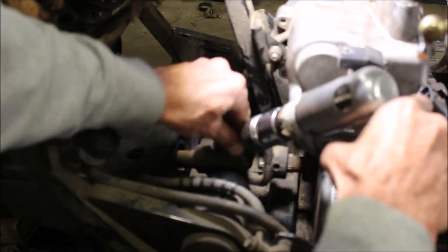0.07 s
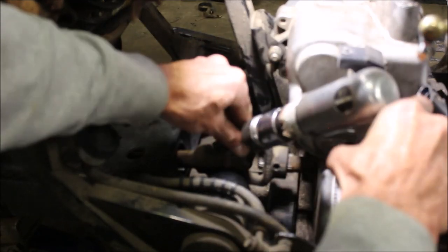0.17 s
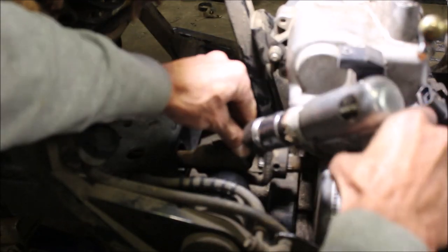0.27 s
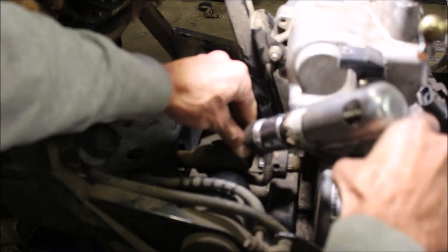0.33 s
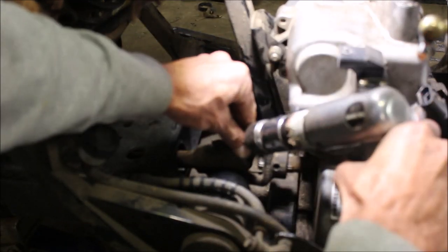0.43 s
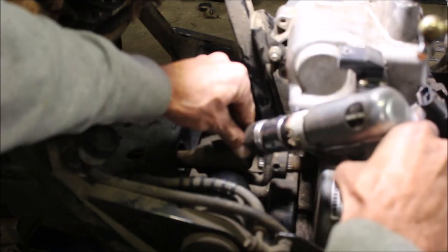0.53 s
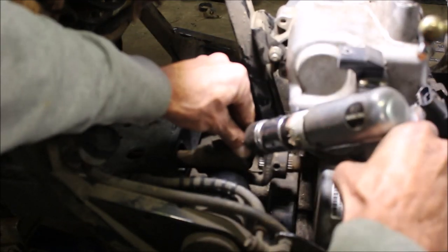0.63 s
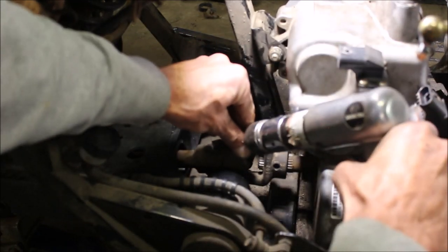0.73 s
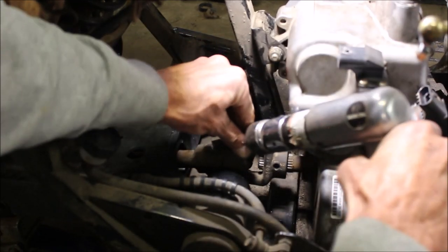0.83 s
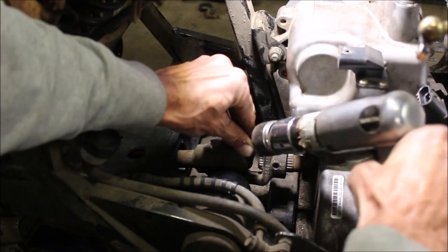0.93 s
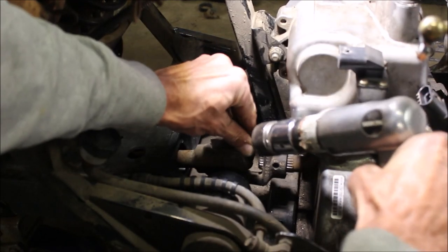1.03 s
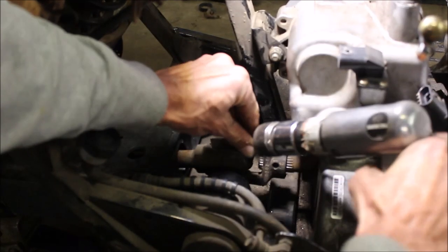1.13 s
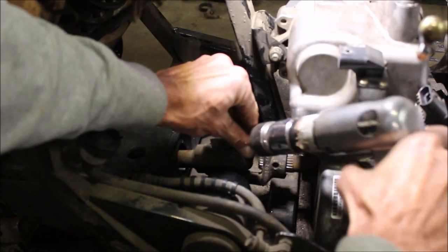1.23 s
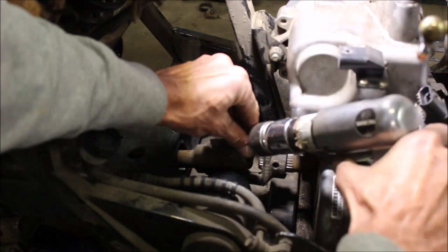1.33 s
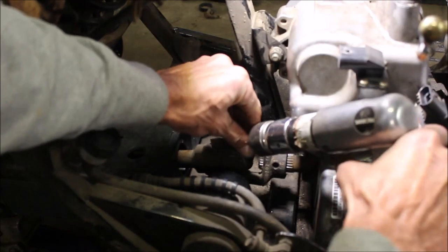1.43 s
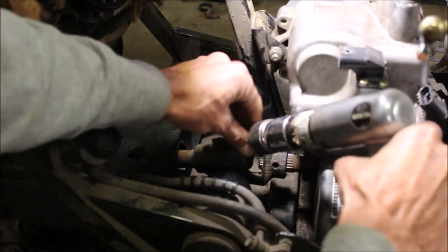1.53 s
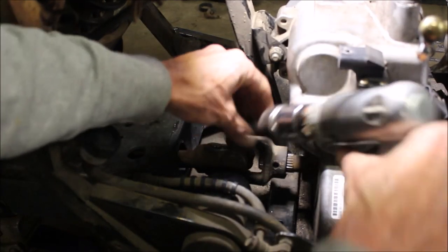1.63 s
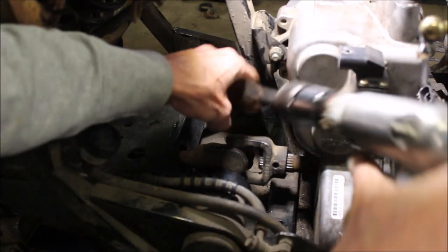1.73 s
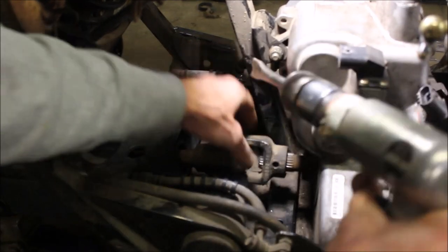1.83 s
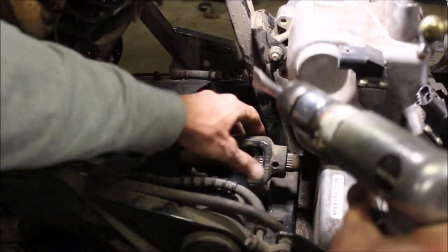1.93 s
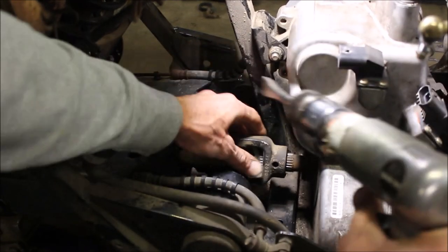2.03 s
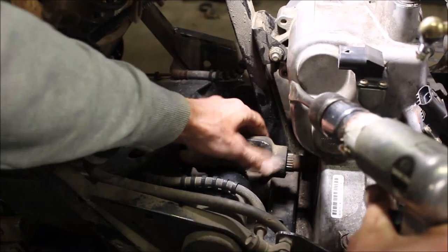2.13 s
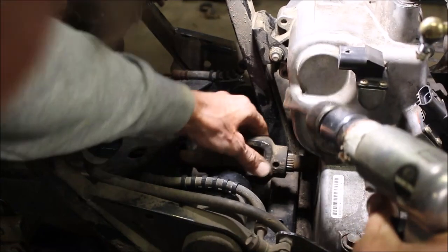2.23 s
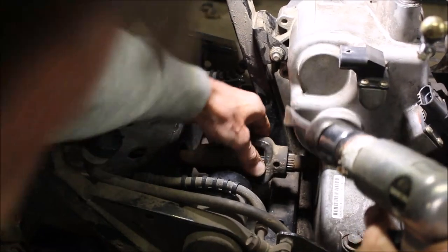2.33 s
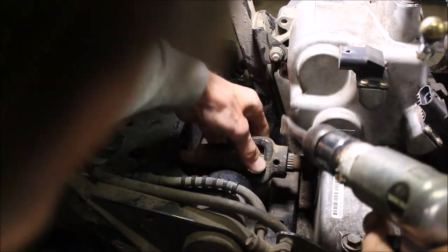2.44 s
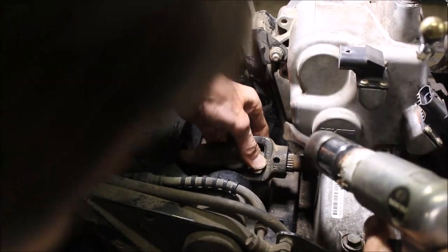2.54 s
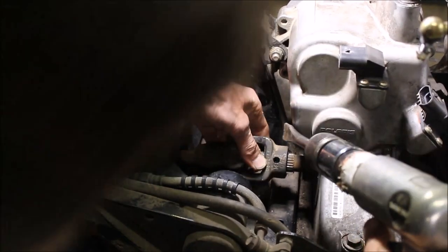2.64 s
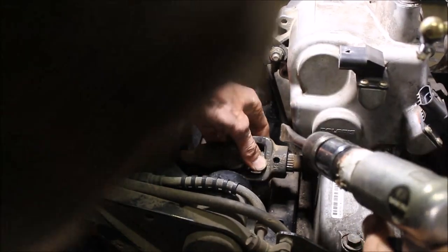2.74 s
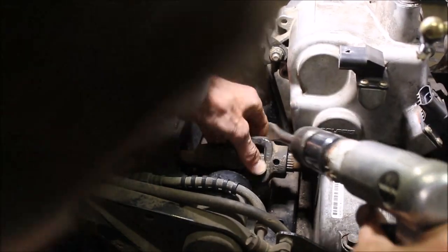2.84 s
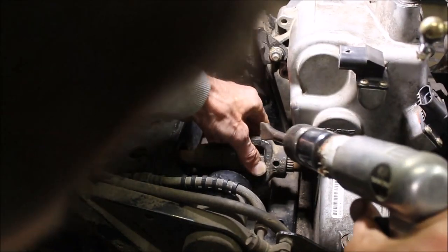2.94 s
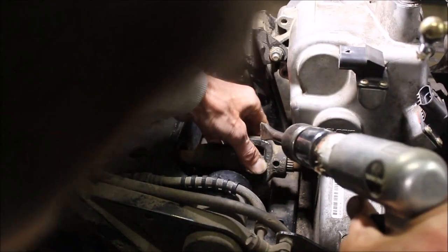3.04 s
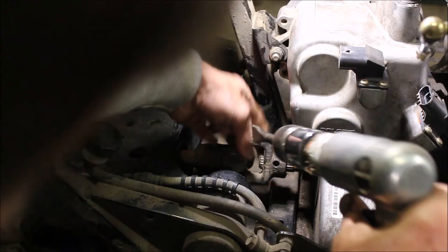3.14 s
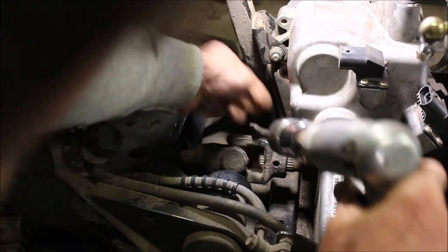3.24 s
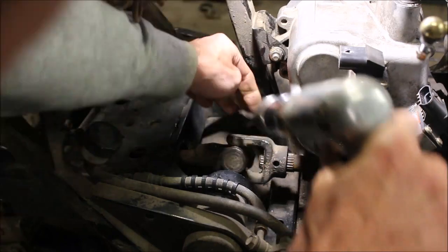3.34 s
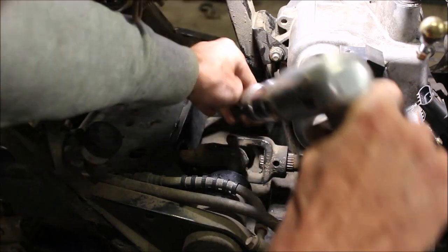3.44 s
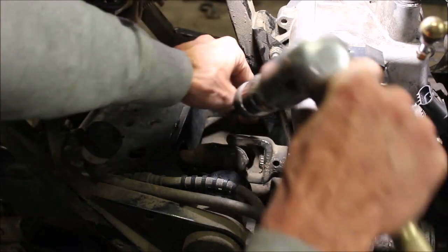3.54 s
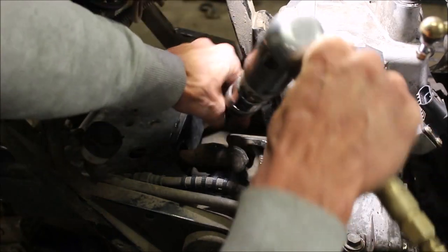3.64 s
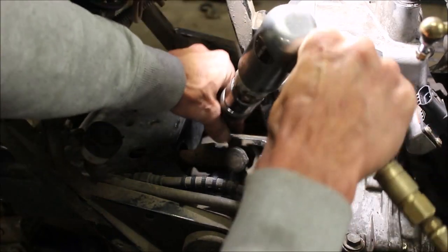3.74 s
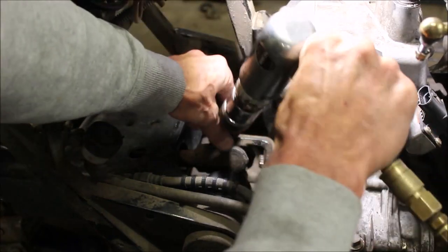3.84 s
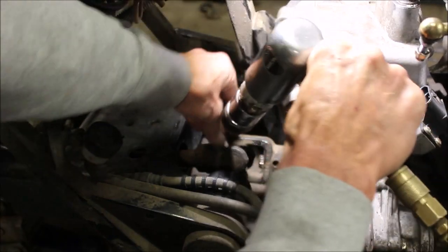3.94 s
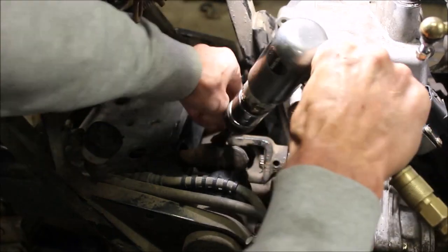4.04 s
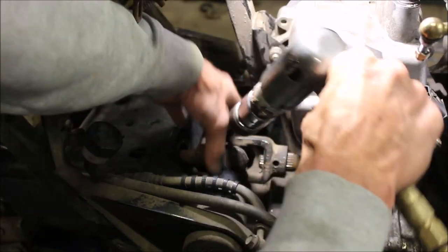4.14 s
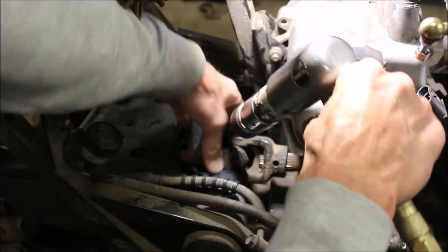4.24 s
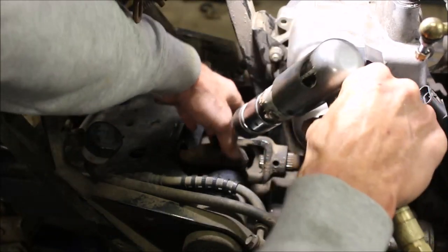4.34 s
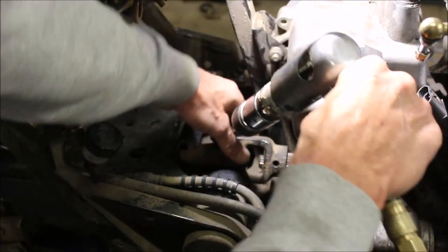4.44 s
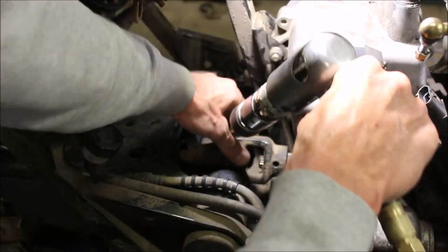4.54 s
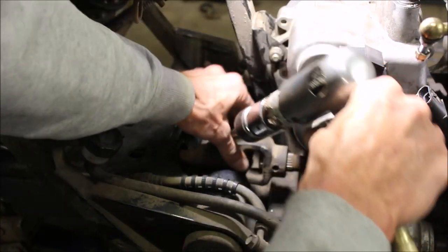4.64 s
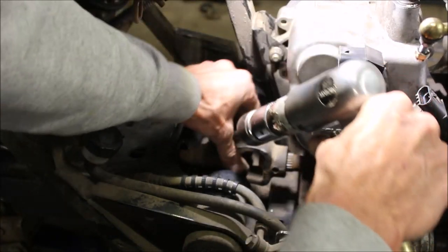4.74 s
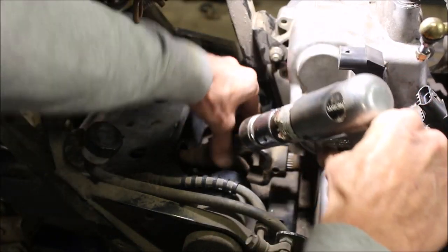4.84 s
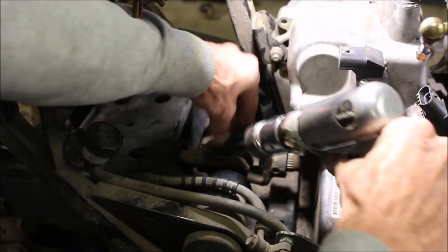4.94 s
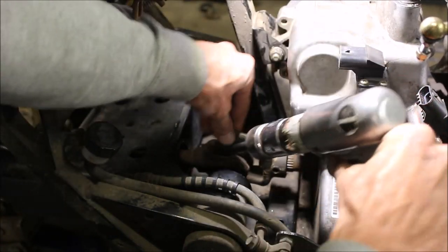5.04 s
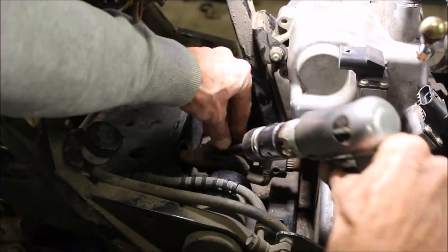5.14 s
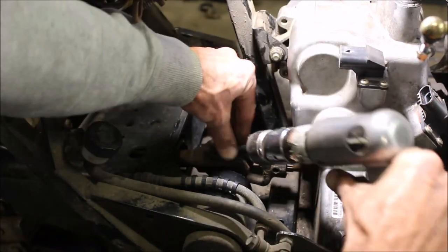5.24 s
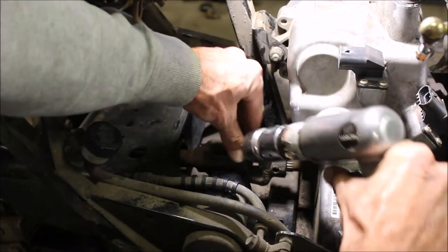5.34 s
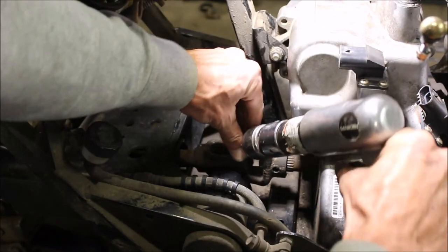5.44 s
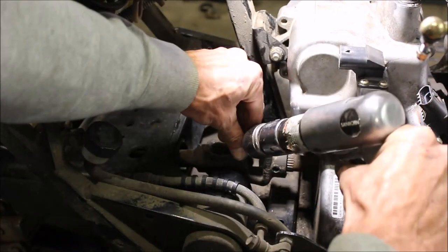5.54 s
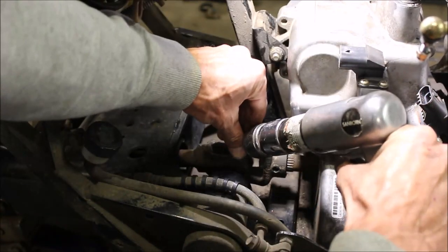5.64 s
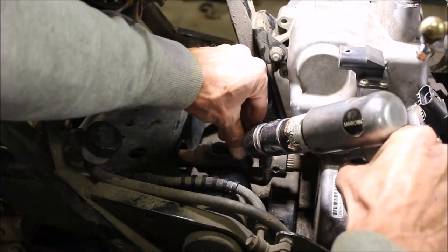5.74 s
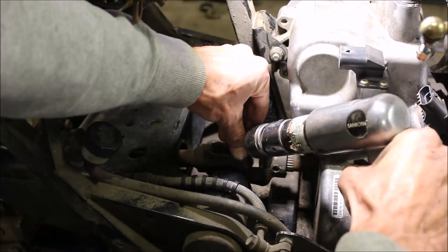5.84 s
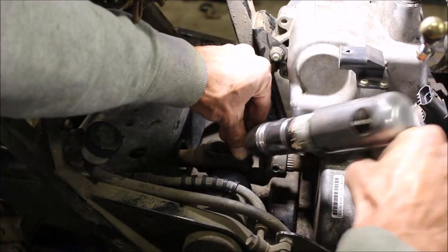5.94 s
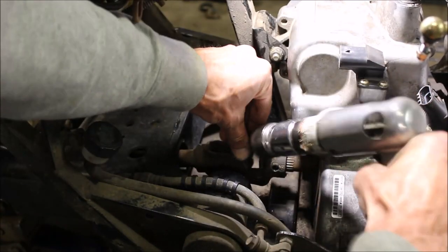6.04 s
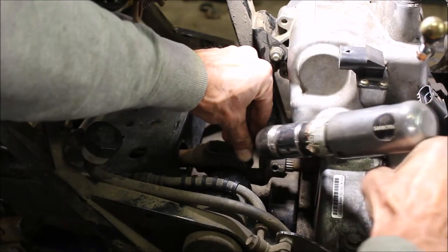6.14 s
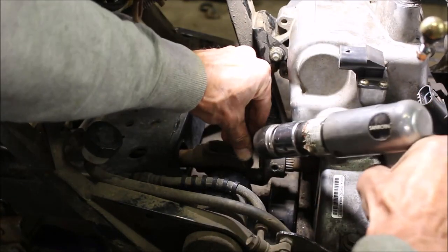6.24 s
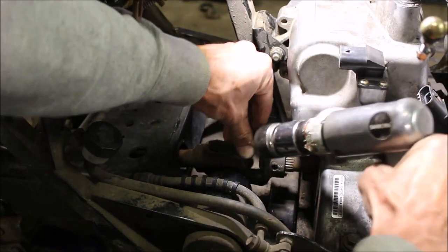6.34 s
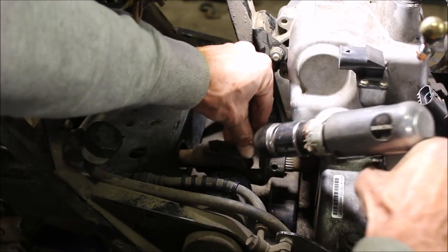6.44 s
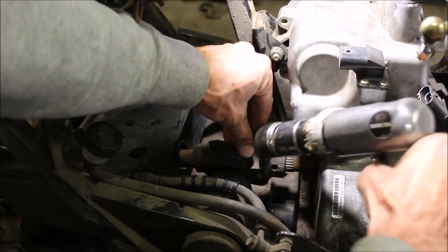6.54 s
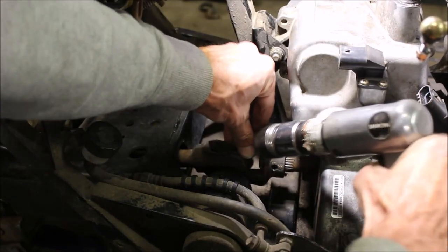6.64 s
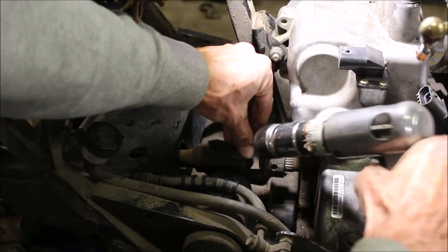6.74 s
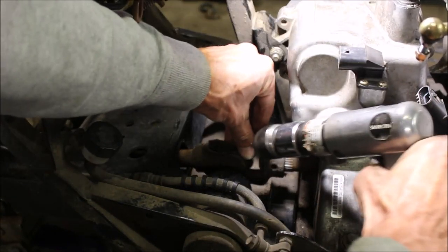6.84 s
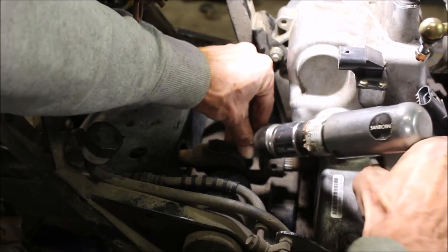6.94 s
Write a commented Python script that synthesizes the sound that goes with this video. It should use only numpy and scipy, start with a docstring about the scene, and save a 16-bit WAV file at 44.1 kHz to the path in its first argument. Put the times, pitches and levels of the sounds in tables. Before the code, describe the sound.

An air hammer rattles in two hard bursts against a steel shaft in a workshop, with thuds, scrapes and metal knocks between.

```python
"""First a workshop hums while a tool bumps, brushes and scrapes on parts; then an air hammer fires two bursts.
The hammer, heard close by in an engine bay, strikes a steel shaft: each stroke pops exhaust air and clanks.
Pops are shaped pressure pulses; clanks are noise and sharp edges ringing through resonances.
Hiss, rumble and rubbing are coloured noise, knocks are sums of fading tones, and the space answers with echoes."""
import sys
import numpy as np
from scipy import signal
from scipy.fft import rfft, irfft, next_fast_len
from scipy.io import wavfile
from scipy.ndimage import uniform_filter1d, map_coordinates

SR = 44100
rng = np.random.default_rng(int(sys.argv[2]) if len(sys.argv) > 2 else 0)


def wav_record(signal):
    """Record a signal, one row per channel, as 16-bit PCM in the file named by sys.argv[1]."""
    frames = np.transpose(np.atleast_2d(signal))
    bounded = np.clip(frames, -1, 1)
    # unit amplitude maps onto the largest positive 16-bit level
    quanta = np.round(bounded * 32767).astype(np.int16)
    wavfile.write(sys.argv[1], SR, quanta)


N = 308259


def amp(db):
    """dB to gain."""
    return 10 ** (np.asarray(db) / 20)


def unit(x):
    """Scaled to rms 1."""
    return x / np.sqrt(np.mean(x ** 2) + 1e-20)


def along(points, hz):
    """Reads a curve of (f/Hz, value) points on a log frequency axis."""
    f, v = np.transpose(points)
    return np.interp(np.log(hz + 1), np.log(f + 1), v)


def gains(curves):
    """Gain over time of (t/s, level/dB) curves added up, each fading to silence just outside its points."""
    t = np.arange(0, N + 32, 32) / SR
    total = np.zeros(len(t))
    for times, levels in map(np.transpose, curves):
        edged = [times[0] - .02, *times, times[-1] + .02]
        total += amp(np.interp(t, edged, np.pad(levels, 1, constant_values=-120)))
    return np.interp(np.arange(N) / SR, t, total)


def wobble(rate):
    """A smooth random curve, rate knots a second."""
    t = np.arange(0, N + 32, 32) / SR
    knots = rng.standard_normal(int(N * rate / SR) + 4)
    return np.interp(np.arange(N) / SR, t, map_coordinates(knots, [t * rate]))


def filtered(x, response):
    """Filters x by a complex response of frequency."""
    length = x.shape[-1]
    m = next_fast_len(length + min(length // 4, SR // 4))
    return irfft(rfft(x, m) * response(np.fft.rfftfreq(m, 1 / SR)), m)[..., :length]


def body(modes, between_db):
    """Response of an object: resonances (f/Hz, width/Hz, level/dB) over a broad base that is weak in the bass."""
    def response(f):
        base = amp(between_db) * 1j * f / (700 + 1j * f)
        return base + sum(amp(db) * 1j * f * w / (c * c - f * f + 1j * f * w) for c, w, db in modes)
    return response


def ports(pair, width):
    """Turns two sounds into left and right: one in the middle, one as the side, shared out by frequency."""
    def split(hz):
        angle = np.arctan(amp(along(width, hz)))
        return np.array([np.cos(angle), np.sin(angle)])
    mid, side = filtered(pair, split)
    return np.array([mid + side, mid - side])


def noise(spectrum):
    """Two noises of rms 1 with a (f/Hz, level/dB) colour."""
    return unit(filtered(rng.standard_normal((2, N)), lambda hz: amp(along(spectrum, hz))))


def add(track, s, sound):
    """Mixes a sound in at time s."""
    start = max(round(s * SR), 0)
    track[..., start:start + sound.shape[-1]] += sound[..., :track.shape[-1] - start]


# machine hum tones: f/Hz, level/dB before a 3 dB lift and slow swelling
HUM_TONES = [(120, -69), (480, -61.5), (1440, -71.5)]
# how loud the deep rumble is: t/s, level/dB
DEEP_LEVEL = [(0, -48), (.3, -60), (1.3, -55), (1.9, -55), (3, -60.5), (4.5, -67), (5.3, -56), (5.8, -63),
              (6.99, -50)]
# colour of the steady room noise: f/Hz, relative level/dB
ROOM_COLOUR = [(15, -48), (25, -38), (49, -9), (102, -3), (140, -1), (325, -6.5), (362, -10), (415, -1.5),
               (475, -11), (529, -8.5), (1250, -17.5), (1400, -15), (3060, -16), (15900, -30.5)]
# stereo width of the room noise: f/Hz, side minus mid level/dB
FAR_WIDTH = [(60, -7), (180, -6), (550, -2), (1650, -1), (4970, -1), (15000, 0)]
SHOP_DB = -50.5


def shop():
    """Steady room noise and a deep rumble, with a faint machine hum that drifts in pitch and strength."""
    t, drift = np.arange(N) / SR, wobble(4.4)
    tones = sum(amp(db + 3) * np.sin(2 * np.pi * hz * (t + .0004 * drift)) for hz, db in HUM_TONES)
    hum = tones * amp(2.5 * wobble(8))
    deep = gains([DEEP_LEVEL]) * noise([(25, -28), (50, -19), (90, 3), (130, -20), (200, -66)])
    steady = amp(SHOP_DB + 0.38 * wobble(2.89)) * noise(ROOM_COLOUR)
    return hum + ports(deep + steady, FAR_WIDTH)


# tool and hose bump the parts: t/s of the peak, level/dB before the layer losses,
# brightness (0 thud to 1 rub), rise/s, time to fall 60 dB/s
BUMPS = [(.0, -38, 0.45, .01, 0.38), (.34, -49.5, 0.9, 0.039, .3), (.45, -46, 0.28, 0.051, .2),
         (.545, -45, 0.66, 0.017, 0.28), (.675, -40, 0.67, 0.0074, 0.12), (1.59, -46, 0.42, .02, 0.17),
         (1.83, -37.5, 0.39, 0.0092, 0.18), (2.46, -41.5, 0.57, 0.025, 0.17),
         (2.555, -36.5, 0.85, 0.032, 0.28), (2.71, -47, 0.47, 0.022, 0.42), (2.98, -38.5, .75, 0.045, 0.31),
         (3.12, -48, 0.94, 0.014, 0.18), (3.63, -58, .05, 0.022, .15), (3.75, -56, .9, .04, 0.16),
         (3.91, -43.5, 0.72, .02, .15), (3.963, -29.5, 0.42, 0.018, 0.43), (4.115, -34.5, 0.28, .012, 0.23),
         (4.17, -45, .05, 0.022, 0.37), (4.36, -50, 0.037, 0.034, 0.12), (4.59, -43.5, 0.61, 0.055, 0.61),
         (4.76, -36.5, 0.69, 0.041, 0.32), (4.93, -46, 0.2, .02, 0.15), (5.045, -28, 0.42, 0.04, 0.37),
         (5.15, -38.5, 0.33, 0.033, 0.48), (5.312, -33, 0.71, 0.0072, 0.4), (5.41, -37.5, .05, .02, 0.13),
         (5.449, -29, 0.37, 0.014, 0.27), (5.56, -45, .05, 0.04, 0.34), (5.62, -49, 0.45, 0.016, .15)]
# a low rumble near 260 Hz lingers; each curve: t/s, level/dB
DRONE_LEVEL = [
    [(0, -56), (.2, -49.5), (.5, -54)],
    [(1.45, -48), (1.75, -48), (2, -45.5), (2.3, -49), (2.7, -75)],
]
# noise colours of the dull, middle and bright layers: f/Hz, relative level/dB
THUD_COLOUR = [(30, -40), (70, -19), (110, -10.5), (180, -4.5), (230, -14.5), (400, -56)]
RUMBLE_COLOUR = [(120, -37), (200, -3.5), (260, 2.5), (350, -4), (600, -44)]
RUB_COLOUR = [(200, -28.5), (380, 15.5), (600, 7.5), (950, 9.5), (1400, -6), (2500, -46)]
APART_DB = 21  # loss of a layer one whole brightness step away, growing with the square of the distance
RISE_DB, RUMBLE_DB = 12.5, -3.5  # climb over one rise time; share of the middle layer


def handling():
    """Low thuds and rubbing as the tool changes place; each bump swells and dies, dull or bright."""
    t = np.arange(-SR // 8, SR // 3) / SR
    layers = np.zeros((3, N + SR // 8))  # spare room at the front for the rises
    layer_brightness = np.array([[0], [.5], [1]])
    for s, db, bright, rise, t60 in BUMPS:
        shape = db + np.where(t < 0, RISE_DB * t / rise, -60 * t / t60)
        add(layers, s, amp(shape - APART_DB * (bright - layer_brightness) ** 2))
    thud, rumble, rub = layers[:, SR // 8:]
    low = thud * noise(THUD_COLOUR)
    middle = (amp(RUMBLE_DB) * rumble + gains(DRONE_LEVEL)) * noise(RUMBLE_COLOUR)
    high = rub * amp(2.05 * wobble(40)) * noise(RUB_COLOUR)
    return low + middle + high


# resonances of the rubbed parts: f/Hz, width/Hz, relative level/dB
PART_MODES = [(910, 75, -9), (1430, 210, -3), (2050, 56, 0), (2910, 75, -7), (3690, 360, -8),
              (4480, 42, -11), (5160, 84, -15), (8280, 180, -17)]


def friction(length, ring_hz, grain_db):
    """Uneven grains of noise ring the parts' resonances, plus one more at ring_hz under the tip."""
    steps = np.repeat(rng.standard_normal(length // 200 + 1), 200)
    lumps = uniform_filter1d(steps, 150)[:length]
    grains = rng.standard_normal((2, length)) * amp(grain_db * lumps)
    modes = body(PART_MODES + [(ring_hz, 180, 1.5)], between_db=-13)
    # soften the treble and take out the bass
    return unit(filtered(grains, lambda f: modes(f) / (1 + (f / 5000) ** 4) / (1 + (900 / (f + 1)) ** 4)))


# how loud the faint brushing is; each curve: t/s, level/dB
BRUSH_LEVEL = [
    [(0, -52), (.12, -58), (.27, -70), (.39, -67), (.6, -75), (.8, -72)],
    [(1.5, -59), (1.75, -56.5), (1.87, -45), (2, -49), (2.43, -48.5), (2.55, -59), (2.67, -50), (2.75, -84)],
    [(3.2, -56), (3.35, -57), (3.8, -56.5), (4.1, -58), (4.4, -62.5), (4.9, -59), (5.04, -47), (5.26, -58),
     (5.41, -43), (5.5, -67), (5.6, -81)],
]


def brushing():
    """A faint brushing: long friction that swells and fades."""
    return gains(BRUSH_LEVEL) * friction(N, 1070, grain_db=2.0)


# single knocks: t/s, level/dB before a shared 8 dB cut, ring centre f/Hz, ring length/s (blended with the steel's),
# crack level/dB against the ring, second ring centre f/Hz, second ring level/dB against the first
KNOCKS = [(.004, -46, 3000, 0.61, 10, 2100, 1), (.664, -18, 760, 0.026, 2, 1810, 1),
          (1.632, -28.5, 1710, 0.091, 1, 4830, 3.5), (1.824, -10.5, 830, 0.11, 1, 1800, -10.5),
          (2.204, -12, 4930, 0.099, -1.5, 9400, 2), (2.221, -21.5, 2770, 0.057, 5, 8340, -10),
          (2.378, -23.5, 4880, 0.059, 4, 8400, -6), (2.632, -38.5, 1510, 0.035, 17.5, 8400, 9),
          (2.847, -38.5, 1290, 0.084, 0, 2300, -3), (2.962, -27, 1020, 0.061, -4, 2020, -14),
          (3.281, -29, 4440, 0.3, 1, 7200, 1), (3.899, -24, 3320, 0.045, 10.5, 8400, 2),
          (3.943, -23.5, 4830, 0.049, 2, 9500, 2), (4.373, -34, 7200, 0.035, 0, 7250, -3),
          (4.598, -20, 2220, 0.023, 4, 4650, -1), (4.738, -21, 2240, 0.014, -7, 7200, -21),
          (4.990, -11, 2220, 0.041, 8, 4870, 5), (4.995, -16.5, 7150, 0.18, -6, 7200, 0),
          (5.022, -17, 5200, 0.24, -4, 3100, -2), (5.016, -12.5, 3870, 0.11, 8.5, 2780, 13),
          (5.135, -24, 1310, 0.085, 8, 5230, 0), (5.295, -19.5, 1310, 0.39, -6.5, 690, 1.5),
          (5.298, -28, 2950, 0.24, -10, 4100, -3), (5.597, -42, 1230, 0.087, -8, 2000, -19)]
# tones of the knocked steel: f/Hz, level/dB (used at a fifth),
# time to fall 60 dB/s (held within 0.06-0.3 s, then blended)
STEEL_TONES = [(684, -9, 0.23), (824, 0, 0.13), (1190, -17, 1.6), (1303, -9, 0.25), (1803, -15, 0.21),
               (2008, -11, 0.16), (2309, -10, 0.15), (2379, -8, 0.12), (2724, -5, 0.12), (2848, -12, 0.33),
               (3079, -18, 0.72), (3182, -7, 0.1), (3289, -18, 0.64), (3768, -19, 0.21), (3881, -17, 0.45),
               (4167, -20, 0.53), (4721, -4, 0.097), (5120, -8, 0.16), (5254, -4, 0.092), (5566, -10, 0.12),
               (6955, -20, 0.34), (7214, -23, 5.0), (8339, -14, 0.12), (8581, -26, 0.22), (9485, -10, 0.12),
               (10680, -33, 0.3)]


def knocks():
    """A knock rings the tones near its two centres most, at new strengths each time, over a short crack."""
    out, t = np.zeros((2, N)), np.arange(SR // 8) / SR
    hz, level, decay = np.transpose(STEEL_TONES)[:, :, None]
    for s, db, centre, t60, crack_db, high, high_db in KNOCKS:
        draw = rng.standard_normal((2, len(hz), 1))
        near = amp(-30 * np.abs(np.log2(hz / centre))) + amp(high_db - 50 * np.abs(np.log2(hz / high)))
        strength = near * amp(.2 * level + 2.5 * draw)
        ring_t60 = np.sqrt(np.clip(decay, .06, .3) * t60)
        fade = amp(-60 * t / ring_t60) * (1 - np.exp(-t / .0005))
        blur = 0.057 * np.cumsum(rng.standard_normal((len(hz), len(t))), 1)  # loose parts smear each tone
        tones = strength * fade * np.sin(2 * np.pi * hz * t + blur)
        ring = np.sum(tones, 1) / np.linalg.norm(strength[0])

        def tint(f):
            band = 1j * f * centre * .9 / (centre ** 2 - f * f + 1j * f * centre * 1.02)
            return band / (1 + 1j * f / 7000) ** 2
        crack = unit(filtered(rng.standard_normal((2, len(t))), tint))
        crack = crack * amp(crack_db - 60 * t / (0.44 * t60))
        add(out, s, amp(db - 8.0) * (ring + crack))
    return out


# the chisel tip drags over a part: t/s, level/dB, held length/s, treble level/dB before its boost and fade,
# f/Hz of the ring under the tip
SCRAPES = [(0.303, -57, 0.035, -23, 2130), (0.373, -51.5, 0.037, -13, 4060),
           (0.5216, -30.5, 0.021, -22, 2300), (0.609, -44.5, 0.012, -26, 1230),
           (0.67, -46, 0.035, -22, 1240), (0.778, -42.5, 0.016, -29, 1180), (1.864, -55, 0.035, 2, 1190),
           (1.994, -46.5, 0.02, -39, 3640), (2.029, -45.5, .016, -33, 3760), (2.075, -45, 0.012, -28, 3540),
           (2.115, -42.5, 0.0096, -23, 3650), (2.157, -52, 0.032, -26, 1230),
           (2.222, -48, 0.028, -14, 4800), (2.3135, -34.5, 0.047, -12.5, 2160),
           (2.366, -39.5, 0.023, -19, 1290), (2.442, -34, 0.031, -14.5, 2780),
           (2.532, -47, .035, -10, 1170), (3.2896, -46.5, 0.034, -4, 4430), (3.698, -44, 0.018, -20, 1260),
           (3.74, -45.5, 0.013, -22, 1280), (3.818, -47, .02, -17, 1280), (3.895, -40.5, 0.033, -11, 2570),
           (3.926, -41, 0.036, -17, 1040), (4.023, -32, 0.039, -14.5, 2050),
           (4.1075, -33, 0.027, -16, 3870), (4.296, -56, 0.074, -4, 3800), (4.552, -44, 0.024, -30, 1230),
           (4.735, -46, 0.056, -31, 1180), (4.8157, -36.5, 0.029, -14, 1230),
           (4.909, -40.5, 0.015, -18, 1150), (4.976, -30, 0.047, -21, 2300),
           (5.012, -30.5, 0.053, -33, 4130), (5.145, -38, 0.024, -25, 1310),
           (5.243, -43.5, 0.021, -24, 2100), (5.2906, -33.5, 0.012, -32, 1230),
           (5.3605, -31.5, 0.025, -15.5, 2740), (5.4334, -31.5, .033, -16, 1040)]
LET_GO = 2.9  # time for the tail to fall 60 dB, in held lengths
TREBLE_BOOST_DB, TREBLE_T60_S = 3.5, 0.21  # a scrape's treble is strongest as it catches


def scrapes():
    """Friction catches at once, holds, then lets go, with a fizz of treble on top."""
    out, treble, t = np.zeros((2, N)), np.zeros(N), np.arange(SR // 6) / SR
    for s, db, length, treble_db, ring_hz in SCRAPES:
        tail_db = -60 * np.maximum(t / length - 1, 0) / LET_GO
        shape = np.minimum(t / 0.0029, 1) * amp(db + tail_db)
        add(out, s, shape * friction(len(t), ring_hz, grain_db=3.5))
        add(treble, s, shape * amp(treble_db + TREBLE_BOOST_DB - 60 * t / TREBLE_T60_S))
    fizz = noise([(3500, -36), (6000, -3.5), (8500, -3), (12000, -8), (16000, -16)])
    return out + treble * amp(1.5 * wobble(170)) * fizz


# trigger pulls: t/s of the first blow, t/s the valve shuts, base pop level/dB, base clank level/dB, hiss level/dB
BURSTS = [(0.8418, 1.265, -15, -14, -26.5), (5.98, 7.097, -14, -14, -26.5)]
# hiss as the valve opens: t/s from the first blow, level/dB over its held level
VALVE_OPENING = [(-.045, -40), (-.022, -17), (-.002, 3), (.03, 8.5), (.11, -2.5), (.25, -0.9)]
# colour of the hiss: f/Hz, relative level/dB
JET_COLOUR = [(180, -44), (300, -15), (928, -7), (1340, 1), (1740, 6), (1990, -3.5), (4070, -2), (6060, -4),
              (11800, -10.5), (15900, -18)]


def air():
    """Rushing air as noise: the hiss surges as the valve opens and carries on until it shuts."""
    curves = []
    for start, stop, _, _, db in BURSTS:
        opening = [(start + s, db + level) for s, level in VALVE_OPENING]
        curves.append(opening + [(stop + 0.018, db)])
    return gains(curves) * noise(JET_COLOUR)


# the piston runs evenly for a few strokes, then changes pace or hangs:
# t/s of the first pop, number of strokes, period/ms (before the small timing jitter)
RUNS = [(.8588, 6, 24.2), (1.0002, 4, 20.9), (1.0869, 4, 24.9), (1.1833, 4, 21.1), (1.2754, 1, 0),
        (5.997, 7, 24.05), (6.1675, 5, 22.05), (6.2823, 3, 21.95), (6.352, 1, 0), (6.3738, 3, 25.5),
        (6.4473, 3, 22.4), (6.5163, 1, 0), (6.5426, 3, 23.7), (6.6121, 5, 22.05), (6.724, 3, 21.9),
        (6.7914, 2, 26), (6.8406, 6, 23), (6.9826, 1, 0)]
# the first pops are loudest; the level drops fast, then slowly
POP_EXTRA_DB, POP_EXTRA_S, POP_SLOW_DB, POP_SLOW_S = 10.5, 0.048, 5, 0.21
# the first clanks are loudest; the level then dips and slowly comes back
CLANK_EXTRA_DB, CLANK_EXTRA_S, CLANK_DIP_DB, CLANK_DIP_S = 7, 0.1, -2.5, 0.37
LONG_STROKE_DB_PER_MS, USUAL_MS = 0.58, 24  # longer strokes hit harder
SCATTER_DB, JITTER_S = 0.5, .00025
LAST_DB = -10.5  # a stroke after the valve shuts is weak
FIRST_BLOW_DB, CLANK_LAG_S = -5, .002  # the opening blow has no pop before it; later clanks trail their pop


def strokes():
    """The piston's timing and loudness, as rows: pop t/s, pop level/dB, clank delay/s, clank level/dB."""
    pops = np.array([s + k * ms / 1000 for s, count, ms in RUNS for k in range(count)])
    gap_ms = 1000 * np.diff(pops, prepend=0)
    extra = LONG_STROKE_DB_PER_MS * np.clip(gap_ms - USUAL_MS, -4, 4)
    scatter = SCATTER_DB * rng.standard_normal((len(pops), 2))
    pops += JITTER_S * rng.standard_normal(len(pops))
    rows = []
    for start, stop, pop_db, clank_db, _ in BURSTS:
        rows.append((start, -120, 0, FIRST_BLOW_DB))
        for s, more, (pop_scatter, clank_scatter) in zip(pops, extra, scatter):
            t, weak = s - start, LAST_DB * (s > stop)
            if not (0 < t and s < stop + .03):
                continue
            more *= t > .03  # the first pop's gap is no stroke length
            fast_drop = POP_EXTRA_DB * np.exp(-(t / POP_EXTRA_S) ** 2)
            pop = pop_db + fast_drop + POP_SLOW_DB * np.exp(-t / POP_SLOW_S)
            early = CLANK_EXTRA_DB * np.exp(-t / CLANK_EXTRA_S)
            clank = clank_db + early + CLANK_DIP_DB * np.exp(-t / CLANK_DIP_S)
            lag = CLANK_LAG_S * min(t / 0.11, 1) ** 2
            rows.append((s, pop + pop_scatter + weak, lag, clank + clank_scatter + more + weak))
    return rows


# resonances of the chisel under the piston: f/Hz, width/Hz, relative level/dB
CHISEL_MODES = [(1686, 13, -24), (3050, 330, -4.5), (4080, 730, -7), (4900, 110, -7.5), (5590, 55, -20),
                (6420, 31, -28), (11640, 580, -15.5), (13600, 380, -28)]
# the struck shaft rings on: f/Hz, relative level/dB, time to fall 60 dB/s (held to 0.5 s at most)
SHAFT_TONES = [(925, 0.5, 0.85), (1710, -6.5, 0.52), (2170, -5, 0.44), (2345, -7, 1.3), (4150, -13, 0.3),
               (4630, -18, 0.47), (5040, -13, 0.62), (5700, -13, 0.71), (6643, -15, 0.42),
               (11600, -29, 0.36)]
# where the chisel bites firmly, one ring stands out in every blow: from t/s, to t/s, f/Hz, width/Hz, level/dB
BITES = [(.8, 1, 2900, 300, 8), (6.16, 6.25, 4210, 495, 9), (6.41, 7, 4080, 443, 11)]


def clanks(cycle):
    """The piston hits the chisel, which chatters for a few ms; a weaker rattle follows on the return stroke."""
    push, t = np.zeros((2, N)), np.arange(SR // 25) / SR
    edge, clock = np.zeros(N), np.arange(N) / SR
    for s, pop_db, lag, db in cycle:
        long = amp(0.9 * max(db + 12.5, 0))  # the loudest blows chatter longer and rattle more
        fall = amp(-60 * np.maximum(t - .0018 * long, 0) / .009 / long)
        chatter = np.minimum(t / .0003 / long, 1) * fall
        rattle = amp(-21) * long ** 2 * np.exp(-((t - .012) / 0.0034) ** 2)
        rattle = rattle * (pop_db > -30)  # none without a pop
        add(push, s + lag - .0004 * long ** 2, amp(db - 1) * (chatter + rattle))
        add(push, s - .0006, amp(pop_db - 6.5 - 60 * t / 0.04))  # the puff's own spit
        edge[round((s + lag) * SR)] = amp(db + 11.5)  # the clean edge of the blow has the same shape each time
    push *= rng.standard_normal((2, N))
    push[0] += edge
    chisel = filtered(push, body(CHISEL_MODES, between_db=-10.5))
    for start, stop, *ring in BITES:
        biting = edge * (clock > start) * (clock < stop)
        chisel[0] += filtered(biting, body([ring], between_db=-120))
    # a ring that fades sooner has a wider resonance
    ringing = [(hz, np.log(1000) / np.pi / min(t60, .5), db + 15.0) for hz, db, t60 in SHAFT_TONES]
    shaft = filtered(push, body(ringing, between_db=-56.0))
    return amp(7.5) * chisel + shaft


def exhaust(cycle):
    """Each stroke vents a puff: a dip of pressure and a swing back, the same shape every time."""
    pops, t = np.zeros(N), np.arange(-60, 1200) / SR
    dip = -np.exp(-((t + .0004) / .0002) ** 2) - .6 * np.exp(-((t + .0001) / .00014) ** 2)
    swing = np.exp(-((t - .0003) / .0003) ** 2)
    slow_bump = np.exp(-((t - .005) / 0.0026) ** 2)
    for s, db, _, _ in cycle:
        thump = 0.014 * max(db + 5.5, 0) * slow_bump  # the loudest pops carry a slow low thump
        add(pops, s + t[0], amp(db - 1.5) * (dip + swing) - thump)
    return pops


# hollows of the engine bay: f/Hz, width/Hz, level/dB before a 5 dB cut
BAY_HOLLOWS = [(130, 33, -20), (225, 33, 7), (248, 41, 6.5), (293, 43, 3.5), (415, 48, 5), (890, 47, 2)]


def bay_boom(pops):
    """The pops make the air in the bay's hollows boom."""
    return amp(-5) * filtered(pops, body(BAY_HOLLOWS, between_db=-40))


# how long the walls ring: f/Hz, time to fall 60 dB/s (multiplied by "shorter" for each echo)
WALL_DECAY = [(100, 0.97), (500, 1), (2000, 0.69), (6000, 0.69), (14000, 0.32)]


def echoes(x, delay, shorter):
    """Noise tail as echo: each frequency dies at its own speed; shorter < 1 makes it quicker."""
    hz, t, grid = signal.stft(rng.standard_normal((2, SR * 3 // 4)), SR, nperseg=128)
    fade = amp(-60 * t / shorter / along(WALL_DECAY, hz)[:, None])
    tail = signal.istft(grid * fade, SR, nperseg=128)[1]
    late = np.pad(x, (round(delay * SR), 0))[None]
    return signal.fftconvolve(late, tail / np.linalg.norm(tail[0]), axes=1)[:, :N]


# air left in the barrel leaks out; each curve: t/s, level/dB
LEAK_LEVEL = [
    [(1.25, -50), (1.29, -40), (1.4, -44.5), (1.5, -52), (1.62, -68)],
]


def leak():
    """Escaping air as a narrow band of hissing noise."""
    return gains(LEAK_LEVEL) * noise([(3000, -34), (4000, 7), (5300, 11), (6500, -35)])


# stereo width of the nearby sounds: f/Hz, side minus mid level/dB
NEAR_WIDTH = [(60, -17), (150, -19), (380, -21), (950, -14), (2380, -9), (5980, -5), (15000, -2)]


def scene():
    """All sources, the near bay and the far walls."""
    cycle = strokes()
    pops, steel, small = exhaust(cycle), clanks(cycle), knocks() + scrapes()
    hiss = air() + leak()
    boom = bay_boom(pops)
    bay = amp(-8.5) * echoes(pops, 0.00241, 0.035)
    room = echoes(amp(-6) * (pops + boom) + amp(-10.0) * (steel[0] + hiss[0]), .011, 1.0)
    room += amp(-13) * echoes(small[0], .01, .4)
    spread = steel + small + hiss + handling() + brushing() + bay + room
    return pops + boom + ports(spread, NEAR_WIDTH) + shop()


# microphone response: f/Hz, level/dB
MICROPHONE = [(20, -1.5), (9000, -0.5), (12000, -4), (14500, -5.5), (16000, -18)]
TOP_HZ = 15950  # nothing passes from here up


def record(dry):
    """The microphone dulls the top and cuts the deep bass, loud peaks are rounded off, then the band limit."""
    heard = filtered(dry, lambda hz: amp(along(MICROPHONE, hz)) * (1j * hz / (40 + 1j * hz)))
    clipped = heard / (1 + np.abs(heard / 1.02) ** 6) ** (1 / 6)
    return filtered(clipped, lambda hz: hz < TOP_HZ)


dry = scene()
out = record(dry)
wav_record(out)
```